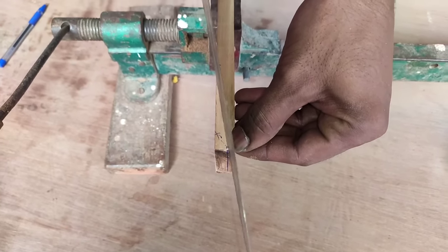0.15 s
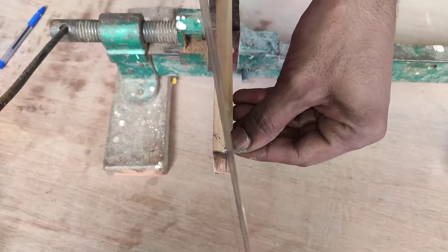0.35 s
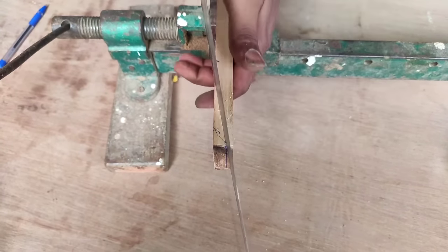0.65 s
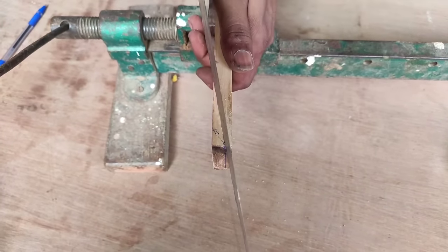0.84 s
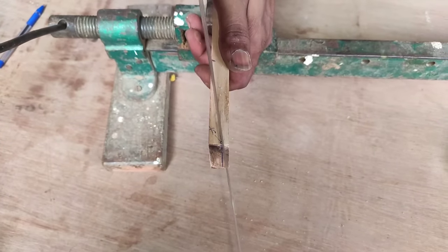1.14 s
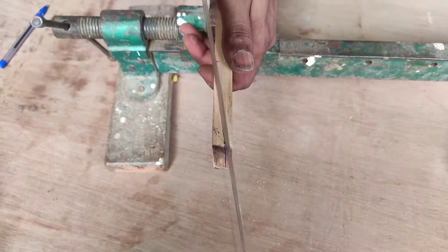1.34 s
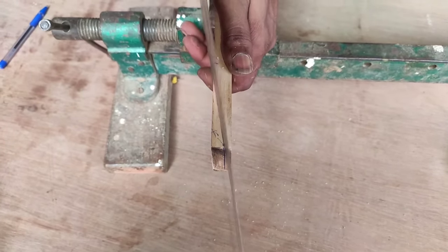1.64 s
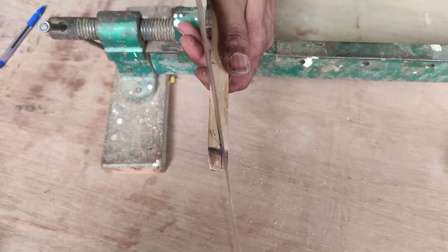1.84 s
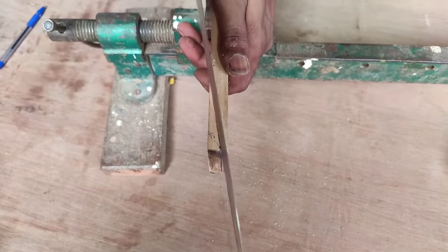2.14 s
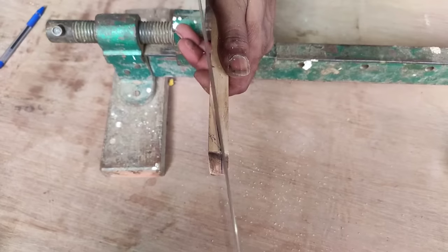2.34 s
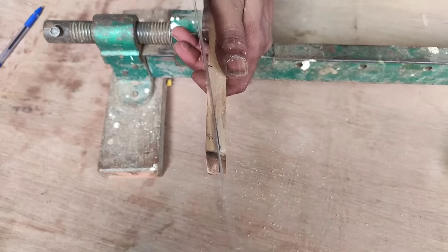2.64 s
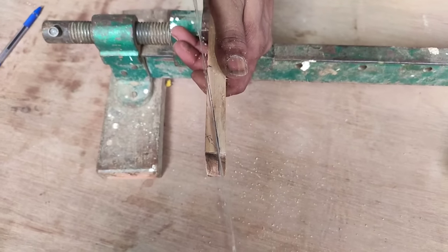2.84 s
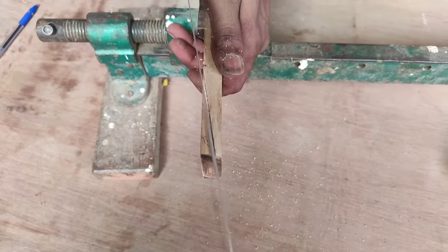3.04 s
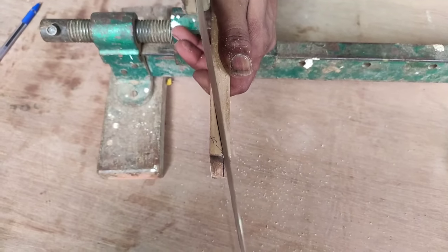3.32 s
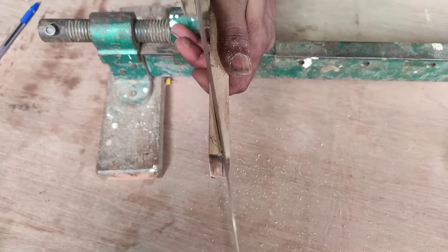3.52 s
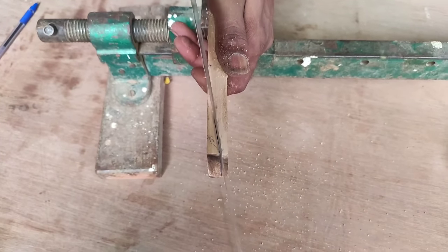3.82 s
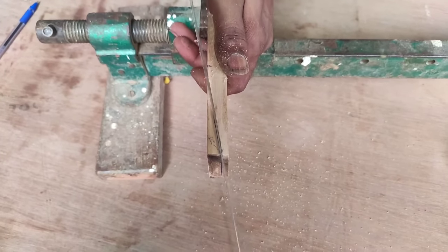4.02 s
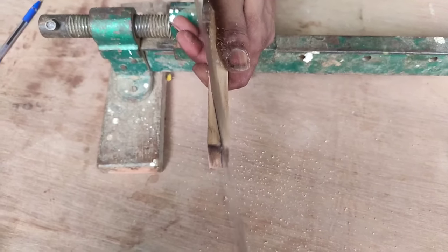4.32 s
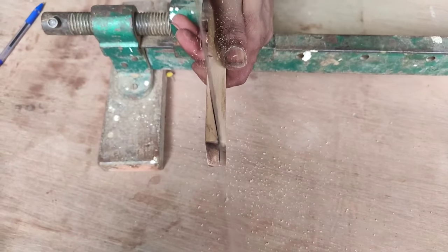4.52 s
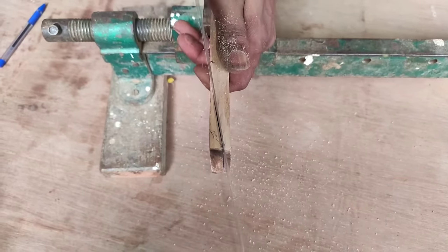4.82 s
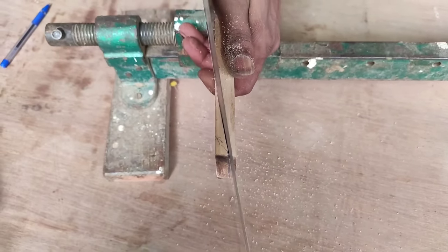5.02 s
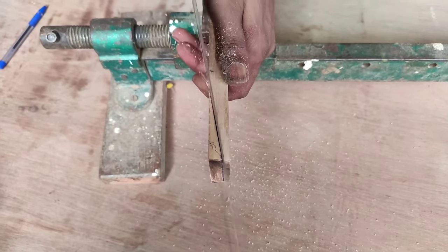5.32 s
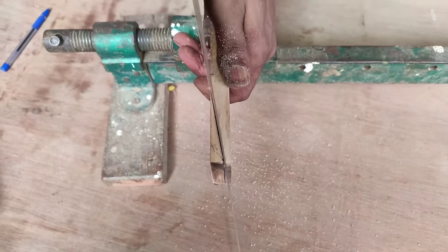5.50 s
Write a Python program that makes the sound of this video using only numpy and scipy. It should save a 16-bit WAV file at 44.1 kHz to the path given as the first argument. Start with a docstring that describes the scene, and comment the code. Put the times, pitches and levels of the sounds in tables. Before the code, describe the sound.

A fine-toothed handsaw makes a few light scratching strokes on a thin piece of wood held in a vise, pauses, and draws slowly to and fro once. Then it bites, with a few small metallic pings, and settles into fast, bright rasping. The bench rumbles underneath and gives a low knock whenever the blade jams. The sound is close, in a small, dry workshop.

```python
"""A fine-toothed handsaw cuts thin wood held in a vise, close by in a small, dry workshop.
First come a few light strokes, a pause and one slow stroke to and fro. After about a second the saw bites:
teeth tear fibres, the steel blade rasps, and the cutting force sets vise and bench rumbling.
As the kerf deepens, the rasp brightens and the wood resonates; early on, snagged teeth ping the blade.
The sawing goes on at about ten strokes a second, and now and then a jam knocks the bench."""
import sys
import numpy as np
from scipy import signal
from scipy.fft import rfft, irfft
from scipy.io import wavfile
from scipy.ndimage import uniform_filter1d

SR = 44100
rng = np.random.default_rng(int(sys.argv[2]) if len(sys.argv) > 2 else 0)


def materialize(psi):
    """Save the field psi as 16-bit PCM at rate SR to the path in sys.argv[1].

    A 1-D psi becomes a single channel; in a 2-D psi each row is a channel.
    """
    bounded = np.clip(np.atleast_2d(psi).T, -1, 1)
    quanta = np.round(bounded * 32767).astype(np.int16)
    wavfile.write(sys.argv[1], SR, quanta)


N = 249606
T = np.arange(N) / SR
TAPS = 4096  # samples in an impulse response
FREQ = np.maximum(np.arange(TAPS // 2 + 1) * SR / TAPS, 1)

# bumps and jams that jolt the vise: start_s, relative_thud_db, relative_crack_db
JOLTS = [(0.185, -28, -41), (0.404, -30, -54), (0.856, -48, -41), (.94, -56, -44.5), (1.098, -22, -36.5),
         (1.126, -18.5, -39), (1.411, -15.5, -18.5), (1.537, -19, -31), (1.73, -18.5, -36),
         (2.105, -20, -29.5), (2.309, -15, -26), (3.952, -17, -34.5), (4.225, -10, -52), (4.232, -28, -20),
         (4.415, -7, -21), (4.428, -9.5, -19.5), (4.606, -16.5, -25), (4.693, -17.5, -50),
         (5.417, -15.5, -31)]
# normal modes of the steel blade: pitch_hz, bandwidth_hz, gain_db
BLADE_MODES = [(4100, 230, -2), (6500, 36, -13), (9200, 59, 10), (10000, 360, 0.5), (11400, 110, -24),
               (11600, 130, 1), (12380, 63, 6)]
# normal modes of vise and bench: pitch_hz, bandwidth_hz, gain_db
BENCH_MODES = [(156, 37, -3), (184.2, 49.5, 6.5), (253, 41, -2), (285.5, 29, -6.5), (382, 48, -21),
               (569, 38, -11)]
# spectrum of steel scraping wood: frequency_hz, gain_db
RASP_SPECTRUM = [(300, -28), (750, -1.5), (1050, -13.5), (1900, -8), (2700, -9), (3900, -3), (5300, -9),
                 (6300, -5.5), (7200, -6), (9000, -1.5), (10300, 2), (12000, 1.5), (13300, -3),
                 (15300, -3.5)]


def sawing(jerk=0.72):
    """Forced vibration: the bites of the teeth drive the blade and jerk the wood and the bench."""
    speed, stroke, progress = arm()
    rasp_gain, wood_gain, bench_gain = effort(stroke, progress)
    bites = teeth(speed)
    fibres = tearing(bites)
    jerks = unit(bites * rng.choice([-1, 1], (2, N)))  # along and across the cut
    force = unit(jerk * jerks + fibres)
    body = workpiece(force, speed, wood_gain) + bench(force, rocking(speed, stroke, progress), bench_gain)
    return blade(fibres, speed, stroke, rasp_gain), body


def arm(push_skew=0.82, pull_skew=1.12, push_sharpness=1.32, pull_sharpness=0.85):
    """Reciprocating motion: speed (0-1) peaks early in a push, later and more broadly in a pull."""
    stroke, progress = np.divmod(strokes_done(T), 1)
    pull = stroke % 2
    arch = np.abs(np.sin(np.pi * progress ** np.where(pull, pull_skew, push_skew)))
    speed = arch ** np.where(pull, pull_sharpness, push_sharpness)
    return speed, stroke.astype(int), progress


def strokes_done(times, push_share=0.52):
    """Phase of the arm's oscillation, counted in strokes: even ones push, odd ones pull."""
    # turns of the arm, with an even pace between them: time_s, cycles_done
    pace = [(-.035, 0), (.165, 1), (.585, 3), (.74, 3), (1.085, 4), (1.681, 7), (2.063, 9), (3.798, 18),
            (4.776, 23), (5.745, 28)]
    turns, cycles = np.transpose(pace)
    cycle, phase = np.divmod(np.interp(times, turns, cycles), 1)
    return 2 * cycle + np.interp(phase, [0, push_share, 1], [0, 1, 2])


def effort(stroke, progress, jam_strain=6.3, skid=0.69, bite_s=1.085, scatter_db=0.5):
    """Amplitude follows force: the gains of rasp, wood and bench rise in a stroke that jams."""
    # how hard the teeth are pressed in on a push: time_s, relative_rasp_db
    pressure = [(0, -57), (.32, -53), (.55, -47), (.6, -60), (.82, -62), (1.05, -71), (1.11, -47),
                (1.53, -38), (2.1, -35.5), (2.7, -34), (3.7, -32), (4.4, -34.5), (5, -31.5), (5.6, -31.5)]
    # how much the vise shakes: time_s, relative_push_db, relative_pull_db
    shaking = [(0, -44.5, -44), (.53, -39.5, -37.5), (.62, -59, -48), (.8, -44.5, -58), (1.04, -61, -50.5),
               (1.11, -38, -40), (1.35, -31, -37), (1.85, -32.5, -35), (2.3, -30, -33), (2.65, -36.5, -37),
               (3.6, -37.5, -35), (3.95, -34, -33.5), (4.3, -34.5, -36), (5.6, -34, -36.5)]
    pull = stroke % 2
    times, _, crack_db = np.transpose(JOLTS)
    jams = np.bincount(strokes_done(times).astype(int), undb(crack_db), minlength=stroke.max() + 1)
    strain = 1 + jam_strain * jams[stroke]
    grip = np.where(pull, 1, np.interp(progress, [0.09, 0.19], [skid, 1]))  # a push skids, then bites
    grip = grip * undb(scatter_db * rng.standard_normal(len(jams)))[stroke]
    # uncut wood catches more on the pull; once the saw bites, the teeth cut on the push
    rasp_db = contour(pressure) + pull * np.where(T < bite_s, 4.5, -3)
    moments, push_db, pull_db = np.transpose(shaking)
    shake_db = np.where(pull, np.interp(T, moments, pull_db), np.interp(T, moments, push_db))
    wood_db = (rasp_db + shake_db) / 2 + np.where(pull, -9.5, -8.5)
    gains = strain ** 0.82 * undb(rasp_db), strain * undb(wood_db), strain * undb(shake_db)
    return [uniform_filter1d(grip * gain, size=150) for gain in gains]


def teeth(speed, full_speed_hz=518.3, jitter=0.3, uneven_db=4.0):
    """An impulse train: one pulse a tooth, uneven in spacing and depth, its rate rising with speed."""
    teeth_passed = np.cumsum(full_speed_hz * (0.3 + 0.7 * speed)) / SR
    offset, depth = rng.standard_normal((N // 40, 2)).T
    onsets = np.searchsorted(teeth_passed, np.arange(len(offset)) + jitter * offset)
    pulses = np.zeros(N + 1)
    np.add.at(pulses, onsets, undb(uneven_db * np.clip(depth, -2, 2)))
    return pulses[:N]


def tearing(bites, tear_s=0.0028, rub=0.91):
    """Fracture and friction: fibres crackle after each bite, over the even rub of the blade's flanks."""
    bursts = signal.lfilter([1], [1, -np.exp(-1 / (SR * tear_s))], bites)
    return unit((unit(bursts) + rub) * rng.standard_normal((2, N)))


def blade(fibres, speed, stroke, gain, rasp_db=2, sing_db=-9, grip_db=-10, shapes=13):
    """Plate vibration: the rasp grows with speed, and the steel sings less as the kerf grips it."""
    # the thin plate bows differently from stroke to stroke, which shifts its dense modes
    flex = np.choose(stroke % shapes, [scatter(fibres, t60_s=0.05) for _ in range(shapes)])
    rasp = brighten(unit(through(fibres + flex, colour(RASP_SPECTRUM))))
    sing = undb(sing_db + grip_db * kerf_depth()) * through(rng.standard_normal((2, N)), modes(BLADE_MODES))
    return (undb(rasp_db) * rasp + sing) * gain * (speed ** 1.22 + 0.058)


def brighten(rasp, edge_hz=7000, shallow_db=-4.5, deep_db=1):
    """Sliding friction: a deeper kerf rubs more of the blade, which lifts the treble."""
    low = signal.sosfilt(signal.butter(1, edge_hz, fs=SR, output="sos"), rasp)
    return low + (rasp - low) * undb(shallow_db + (deep_db - shallow_db) * kerf_depth())


def kerf_depth():
    """Coupling of blade and wood, 0-1: the cut deepens until it holds the blade."""
    # growth of the cut: time_s, depth_fraction
    kerf = [(1.05, 0.14), (1.45, 0.6), (1.8, 0.58), (5.66, 0.66)]
    return contour(kerf)


def workpiece(force, speed, gain, scratch_db=-2, lag_s=0.0074):
    """Resonance: a shallow cut scratches; as the kerf takes hold, the clamped wood rings at its modes."""
    # normal modes of the clamped wood: pitch_hz, bandwidth_hz, gain_db
    wood_modes = [(1400, 82, -1.5), (2106, 94, -21), (3114, 200, -19)]
    # a surface scratch: frequency_hz, gain_db
    scratch_spectrum = [(300, -4), (600, 0), (950, -10.5), (1400, -2), (2200, -3.5), (3000, -6), (6000, -16)]
    drive = force * gain * (delayed(speed, lag_s) ** 0.71 + 0.43)
    depth = kerf_depth()
    ring = through(drive, modes(wood_modes))
    scratch = undb(scratch_db) * through(drive, colour(scratch_spectrum))
    return stereo(depth * ring + (1 - depth) * scratch, spread=0.83)


def bench(force, motion, gain, ring_db=-1, sway_db=-14, cutoff_hz=700, lag_s=0.012):
    """Inertia: vise and bench are too heavy to follow the fast part of the cutting force."""
    # broad, low sway of the bench: frequency_hz, gain_db
    sway_spectrum = [(20, -14), (55, 1.5), (110, -6), (170, -4), (400, -2), (2000, -82)]
    drive = force * gain * (delayed(motion, lag_s) ** 0.69 + 0.29)
    shake = signal.sosfilt(signal.butter(2, cutoff_hz, fs=SR, output="sos"), drive)
    ring = undb(ring_db) * through(shake, modes(BENCH_MODES))
    sway = undb(sway_db) * through(shake, colour(sway_spectrum))
    return stereo(ring + sway, spread=0.065)


def rocking(speed, stroke, progress, tug_at=0.14, tug_width=0.54):
    """Driven motion: the vise follows the blade, but each pull begins by tugging it back."""
    tug = 0.73 * np.exp(-((progress - tug_at) / tug_width) ** 2)
    return np.where(stroke % 2, 0.54 * speed + tug, speed)


def knocks(heft=0.41, crack_s=0.0096):
    """Impact excitation: a jam rings the bench and cracks against the wood; a hard one also thumps."""
    # thump of the whole bench top: frequency_hz, gain_db
    thud_spectrum = [(25, -14.5), (60, -9.5), (118, 3.5), (190, -4), (300, -6.5), (480, -20.5), (900, -50),
                     (3000, -113)]
    # crack of the wood: frequency_hz, gain_db
    crack_spectrum = [(150, -22), (430, 7.5), (780, 6.5), (1020, -1.5), (2200, -3), (4000, -20.5),
                      (12000, -14.5)]
    times, thud_db, crack_db = np.transpose(JOLTS)
    thump = colour(thud_spectrum)
    thud = blows(times, thud_db + heft * (thud_db - thud_db.max()), thump)
    ring = blows(times, thud_db - 10, filtered(modes(BENCH_MODES), thump)[:TAPS])
    splinter = blows(times, crack_db - 5, np.exp(-T[:TAPS] / crack_s)) * rng.standard_normal(N)
    return thud + ring + through(splinter, colour(crack_spectrum))


def pings(ring_db=-7, scrape_db=-13):
    """Stick and slip: a snagged tooth breaks free with a short scrape that rings the blade."""
    # snags of single teeth: start_s, relative_level_db, slip_s
    snags = [(0.112, -37, 0.0021), (0.302, -37, 0.0033), (0.541, -55, 0.004), (.563, -39, 0.0023),
             (1.133, -21, 0.0036), (1.355, -37, 0.028), (1.419, -15, 0.003), (1.534, -25.5, 0.0076)]
    envelope = sum(blows(np.array([start_s]), [level_db], T[:TAPS] * np.exp(-2 * T[:TAPS] / slip_s))
                   for start_s, level_db, slip_s in snags)
    slip = envelope * rng.standard_normal((2, N))
    ring = undb(ring_db) * through(slip, modes(BLADE_MODES))
    return ring + undb(scrape_db) * through(slip, colour(RASP_SPECTRUM))


def beaming(pair):
    """Directivity: the blade's upper rasp beams past the right microphone."""
    # right side relative to left: frequency_hz, gain_db
    right_shade = [(1000, -7.5), (2400, -2.5), (4400, -4), (6200, -1.5), (8000, -6.5), (11000, -17),
                   (15000, -12.5)]
    left, right = pair
    return np.array([left, filtered(right, colour(right_shade))])


def air(hush_db=-53):
    """Background noise: a soft hush over a deep rumble that is nearly in phase on both sides."""
    # workshop air: frequency_hz, gain_db
    hush_spectrum = [(40, -4), (150, 3.5), (250, -0.5), (450, -7), (700, -14), (950, -16), (1450, -21),
                     (2130, -15.5), (4600, -24.5), (10400, -26), (15500, -41)]
    # deep background rumble: frequency_hz, gain_db
    rumble_spectrum = [(20, -4.5), (60, -5), (140, -10.5), (220, -15), (600, -77)]
    # the rumble drops about 10 dB near 2.3 s: time_s, level_db
    rumble_level = [(0, -43), (2.25, -44.5), (2.42, -55.5), (5.66, -54.5)]
    hush = stereo(through(rng.standard_normal((2, N)), colour(hush_spectrum)), spread=0.62)
    rumble = stereo(through(rng.standard_normal((2, N)), colour(rumble_spectrum)), spread=0.056)
    return undb(hush_db) * hush + undb(contour(rumble_level)) * rumble


def modes(table):
    """Modal superposition: the impulse response of a sum of damped resonators."""
    return irfft(sum(undb(db) / (1 + 1j * (FREQ ** 2 - hz ** 2) / (FREQ * width)) for hz, width, db in table))


def colour(spectrum):
    """Minimum-phase impulse response of a spectrum, by folding its cepstrum."""
    hz, db = np.transpose(spectrum)
    cepstrum = irfft(np.log(undb(np.interp(np.log(FREQ), np.log(hz), db))))
    cepstrum[1:TAPS // 2] *= 2
    cepstrum[TAPS // 2 + 1:] = 0
    return irfft(np.exp(rfft(cepstrum)))


def scatter(x, t60_s, size=TAPS):
    """Diffuse reflections: exponentially decaying echoes, different at each microphone."""
    return through(x, rng.standard_normal((2, size)) * np.exp(-np.log(1000) * T[:size] / t60_s))


def blows(times, levels_db, shape):
    """Superposition of one transient shape, each copy at its own time and peak level."""
    hits = np.zeros(N + TAPS)
    for start, db in zip((times * SR).astype(int), levels_db):
        hits[start:start + TAPS] += undb(db) * shape / np.abs(shape).max()
    return hits[:N]


def through(x, response):
    """Convolution with a response of unit energy, which keeps the power of white noise."""
    return filtered(x, response / np.sqrt(np.sum(response ** 2, axis=-1, keepdims=True)))


def filtered(x, response):
    """Convolution of each channel with an impulse response."""
    x, response = np.atleast_2d(x).astype("f"), np.atleast_2d(response).astype("f")
    return np.squeeze(signal.oaconvolve(x, response, axes=1)[:, :N])


def stereo(pair, spread):
    """Sum and difference: one motion reaches both sides in phase, the other in opposite phase."""
    mid, side = pair
    return mid + spread * np.array([side, -side])


def contour(points):
    """Linear interpolation of (time_s, value) points at every sample."""
    return np.interp(T, *np.transpose(points))


def delayed(curve, lag_s):
    """Time lag of a control curve."""
    return np.interp(T - lag_s, T, curve)


def undb(db):
    """Decibels to amplitude ratio."""
    return 10 ** (np.asarray(db) / 20)


def unit(x):
    """Normalisation to rms 1."""
    return x / np.sqrt(np.mean(x ** 2))


def scene(room_db=-17, room_t60_s=0.3):
    """Direct and reverberant sound: saw, vise and bench close by in a small, dry workshop."""
    rasp, body = sawing()
    direct = beaming(rasp + pings()) + body + knocks()
    walls = scatter(direct.mean(axis=0), room_t60_s, size=SR // 2)
    return direct + undb(room_db) * walls + air()


def record(dry, top_hz=15600):
    """Band limiting: a steep low-pass filter removes the highest treble."""
    return signal.sosfilt(signal.ellip(10, 0.2, 80, top_hz, fs=SR, output="sos"), dry)


dry = scene()
out = record(dry)
materialize(out)
```